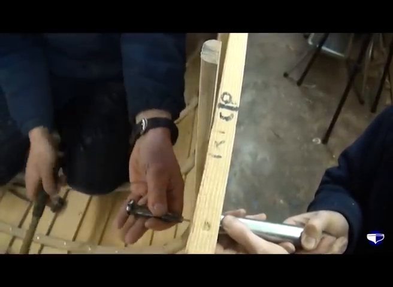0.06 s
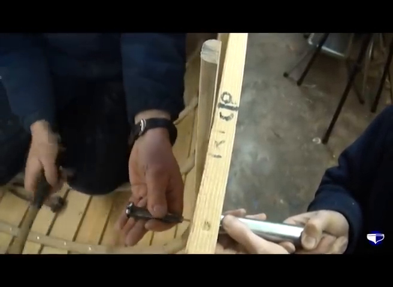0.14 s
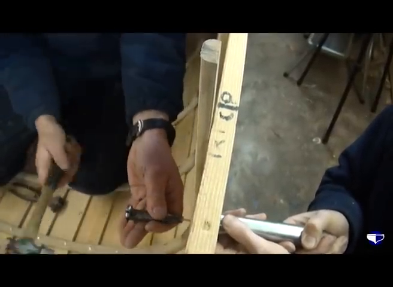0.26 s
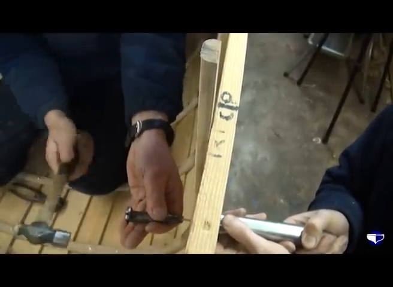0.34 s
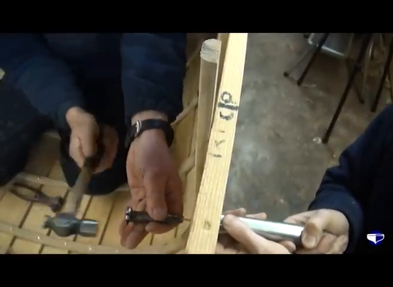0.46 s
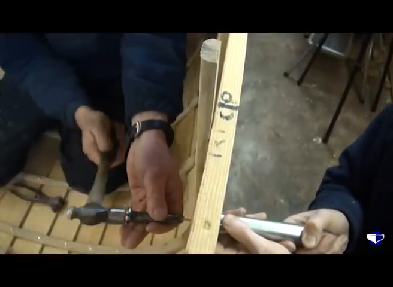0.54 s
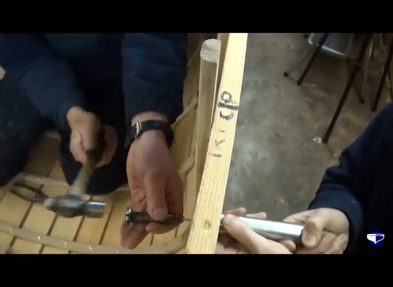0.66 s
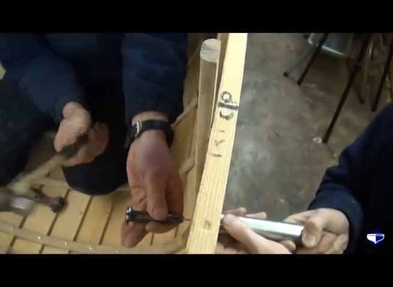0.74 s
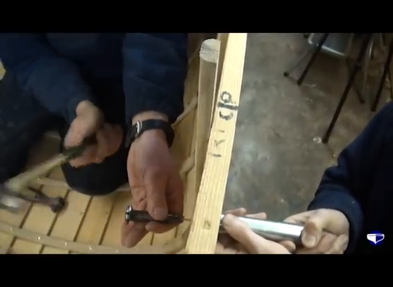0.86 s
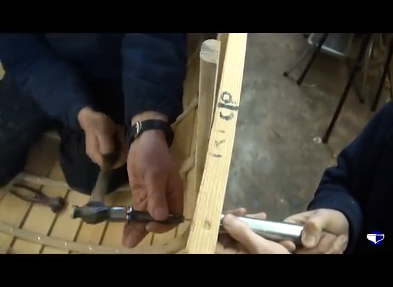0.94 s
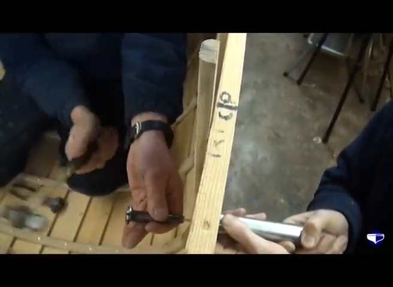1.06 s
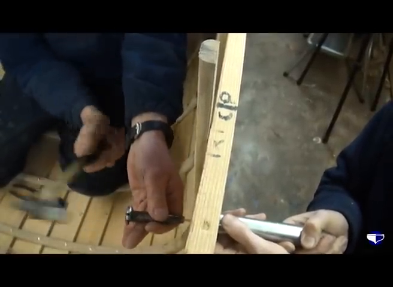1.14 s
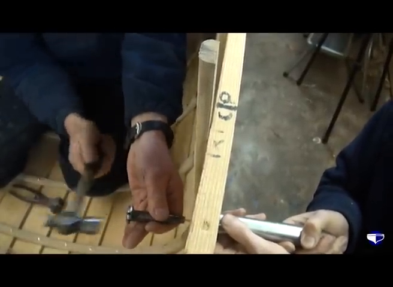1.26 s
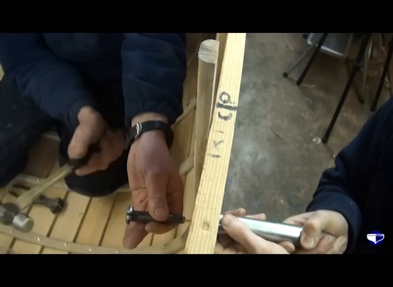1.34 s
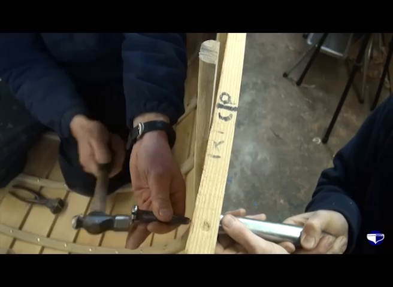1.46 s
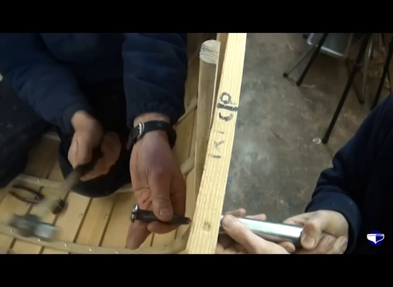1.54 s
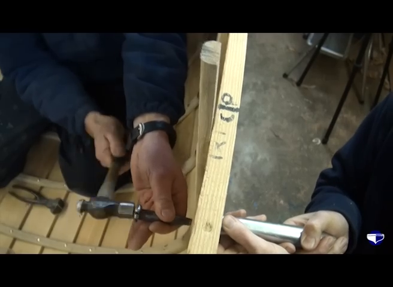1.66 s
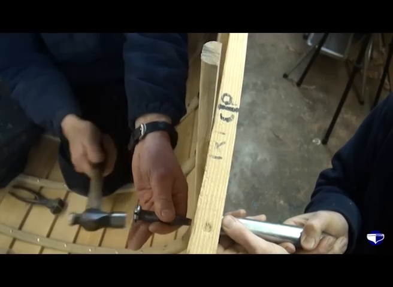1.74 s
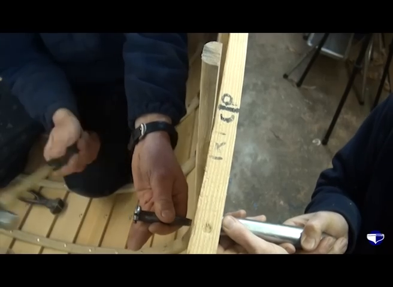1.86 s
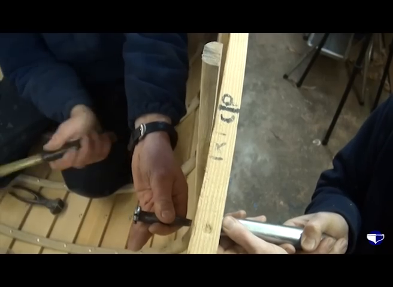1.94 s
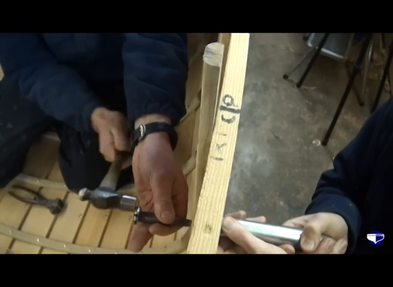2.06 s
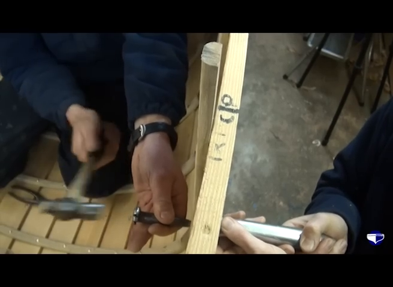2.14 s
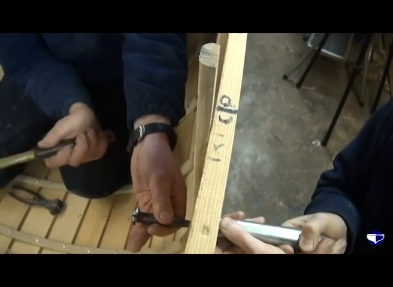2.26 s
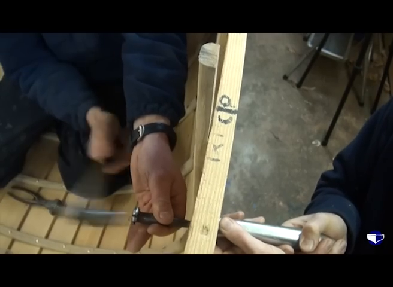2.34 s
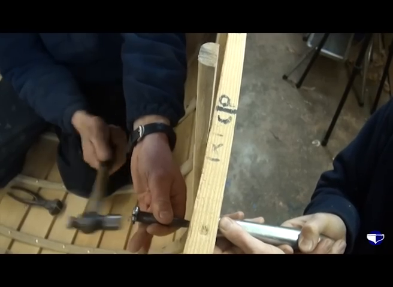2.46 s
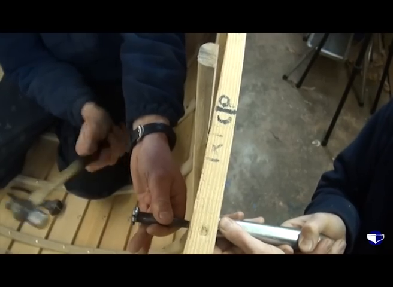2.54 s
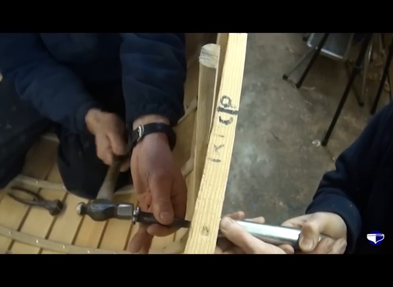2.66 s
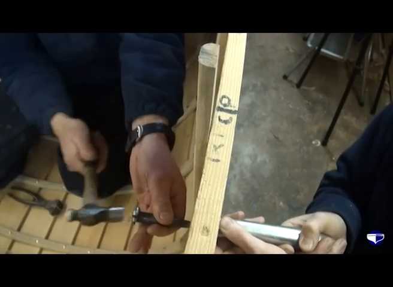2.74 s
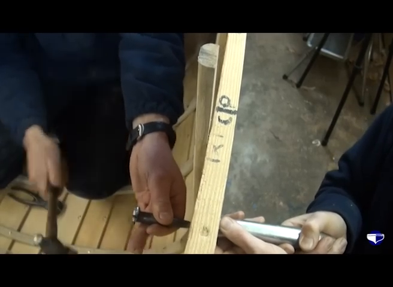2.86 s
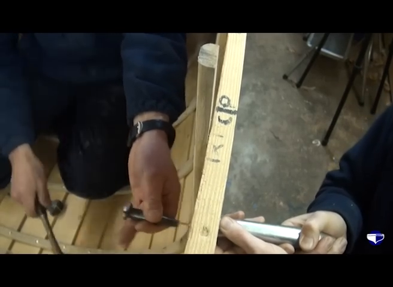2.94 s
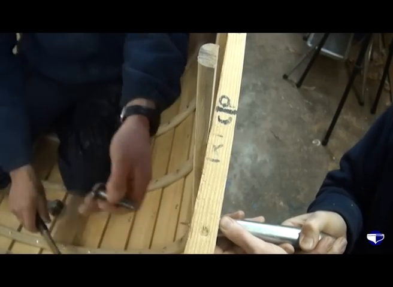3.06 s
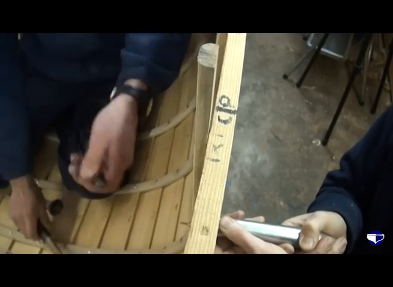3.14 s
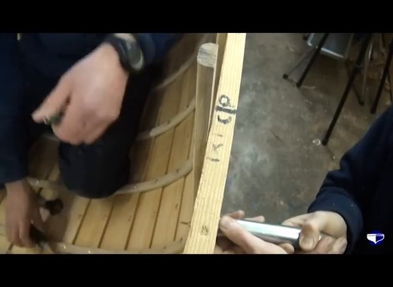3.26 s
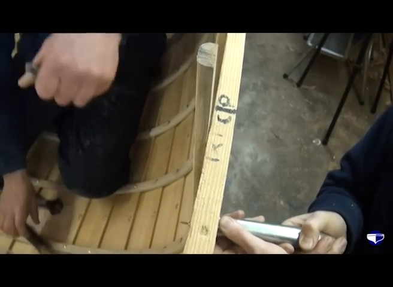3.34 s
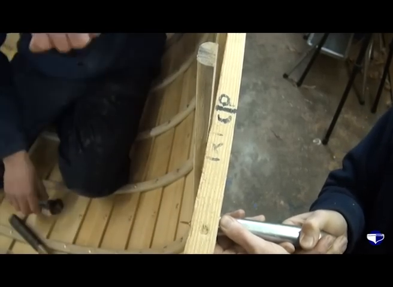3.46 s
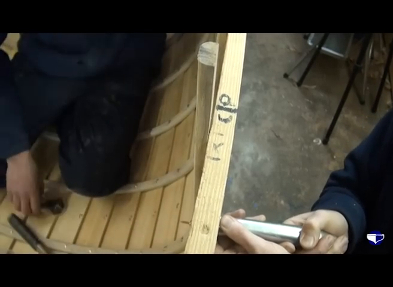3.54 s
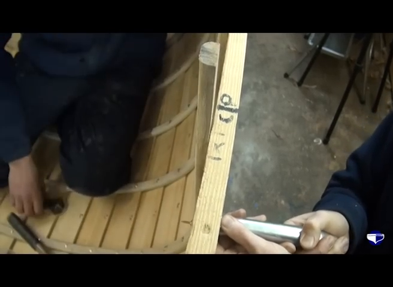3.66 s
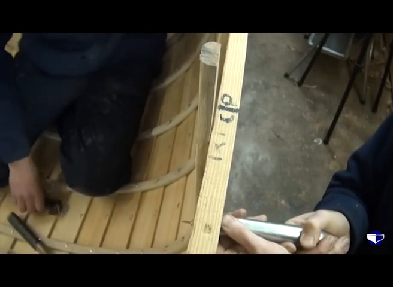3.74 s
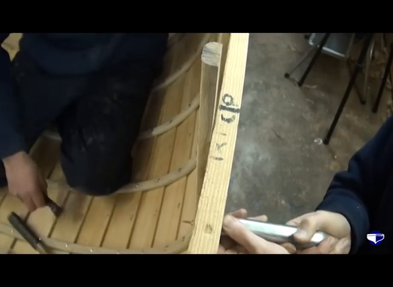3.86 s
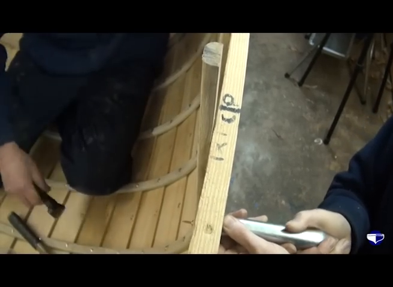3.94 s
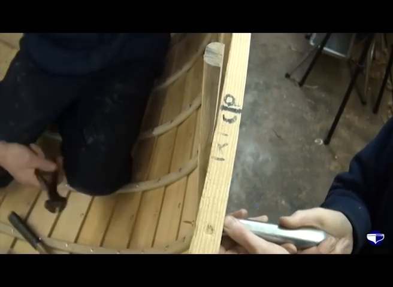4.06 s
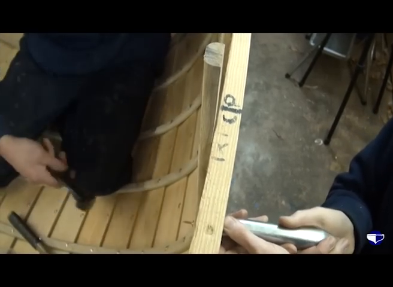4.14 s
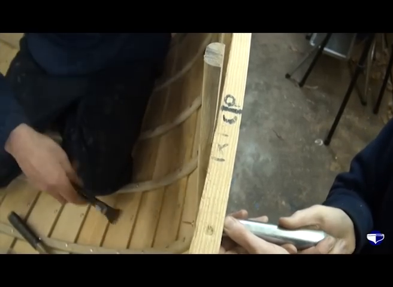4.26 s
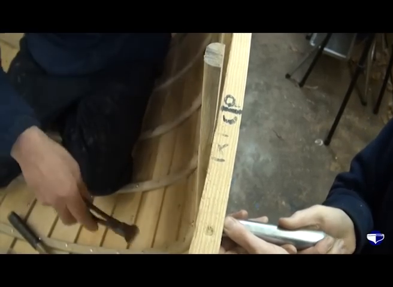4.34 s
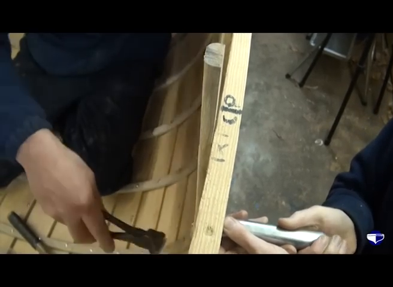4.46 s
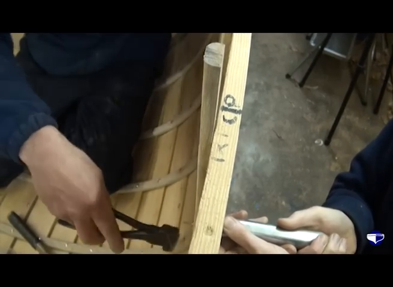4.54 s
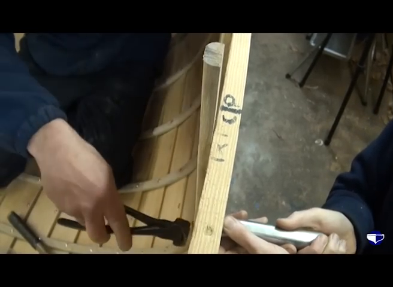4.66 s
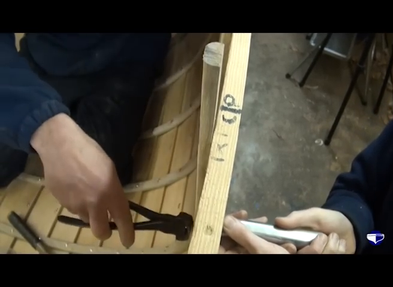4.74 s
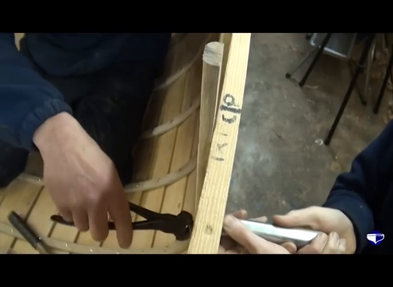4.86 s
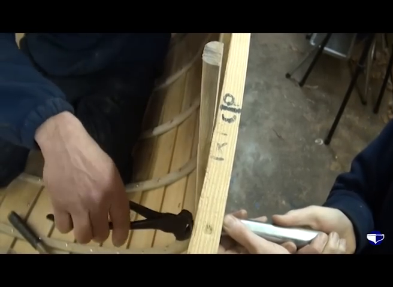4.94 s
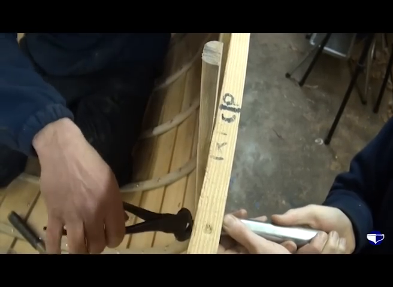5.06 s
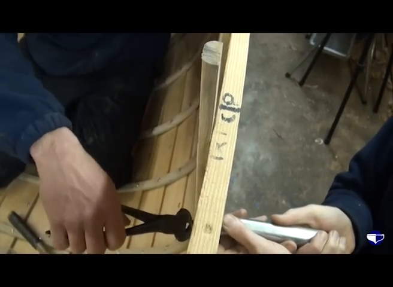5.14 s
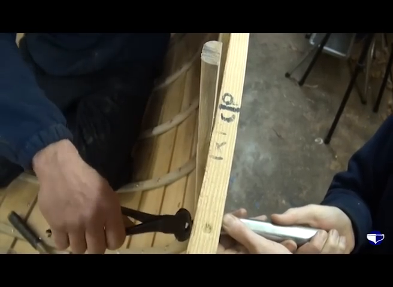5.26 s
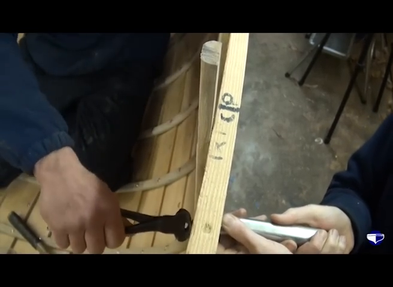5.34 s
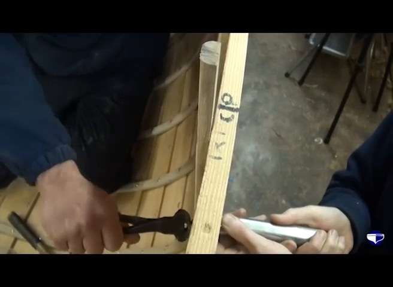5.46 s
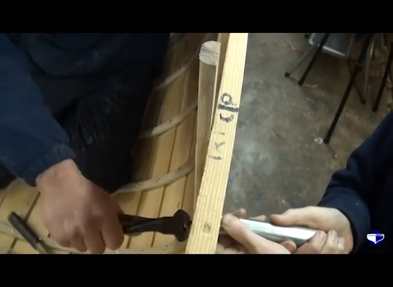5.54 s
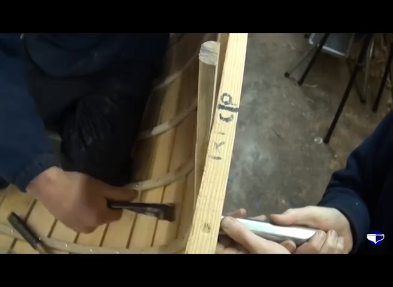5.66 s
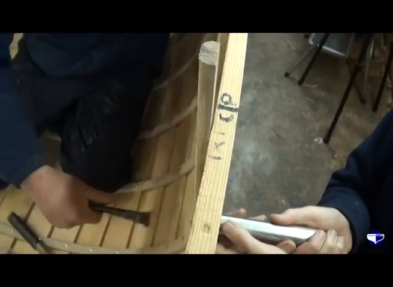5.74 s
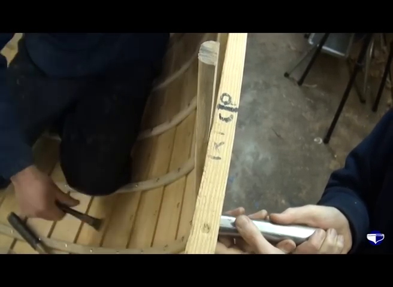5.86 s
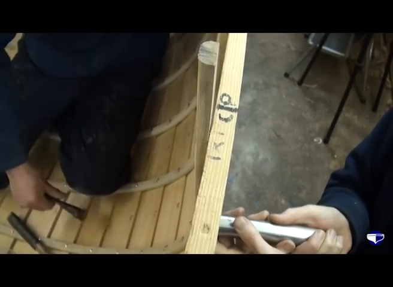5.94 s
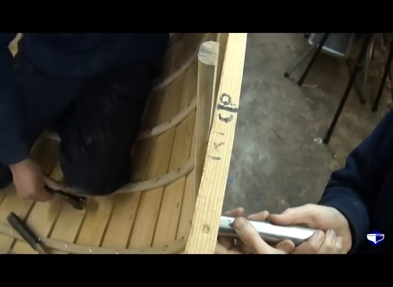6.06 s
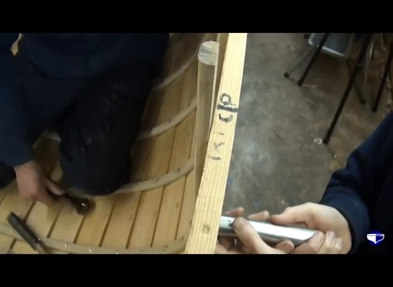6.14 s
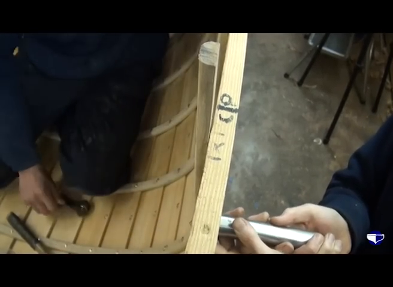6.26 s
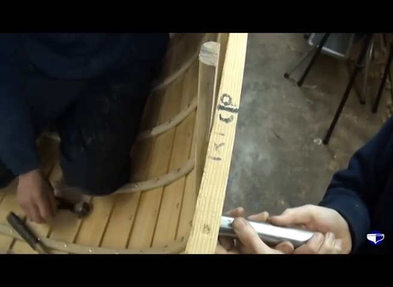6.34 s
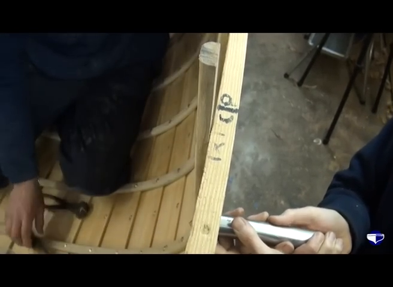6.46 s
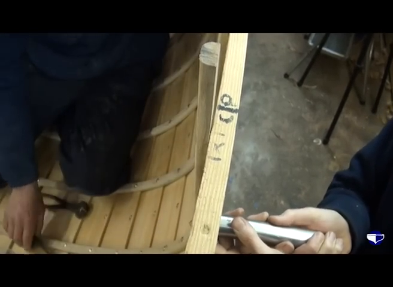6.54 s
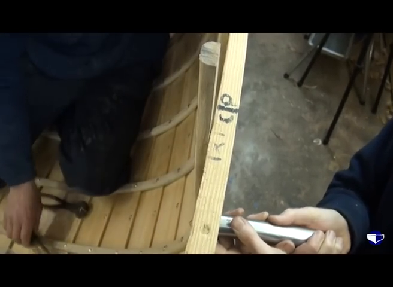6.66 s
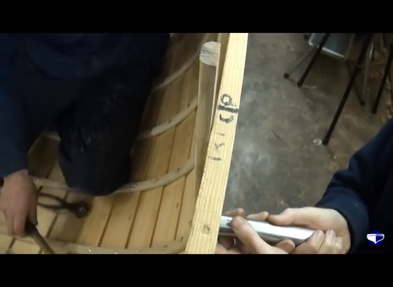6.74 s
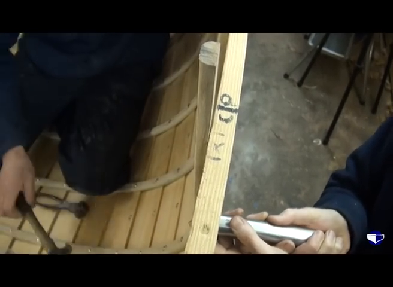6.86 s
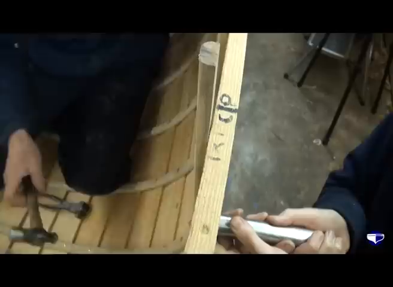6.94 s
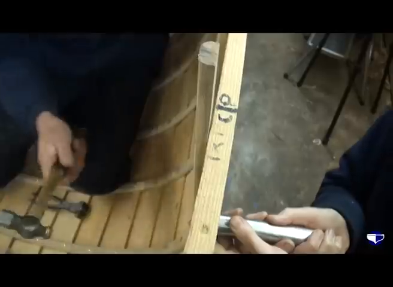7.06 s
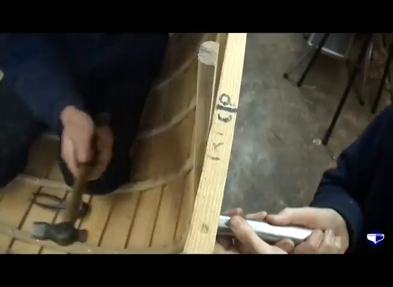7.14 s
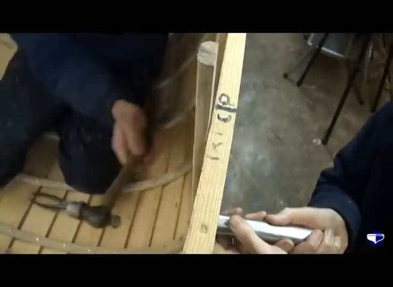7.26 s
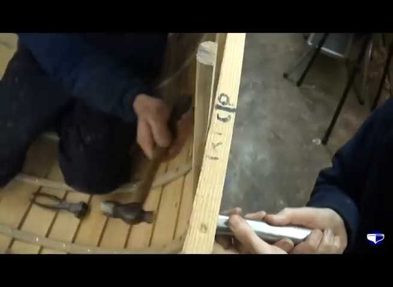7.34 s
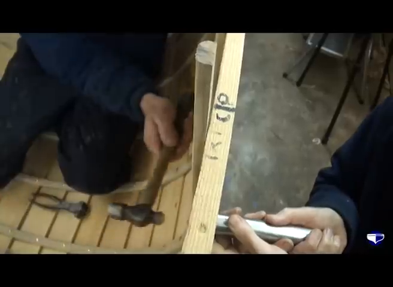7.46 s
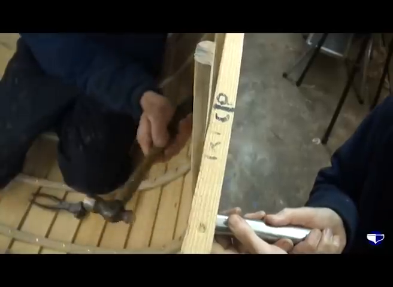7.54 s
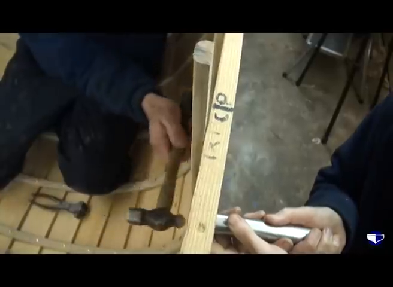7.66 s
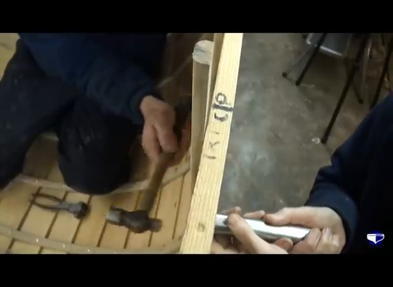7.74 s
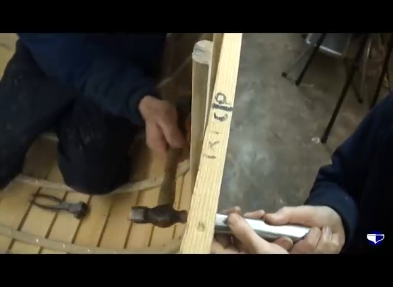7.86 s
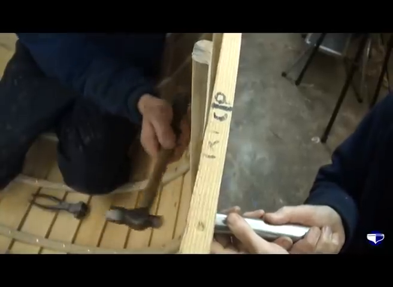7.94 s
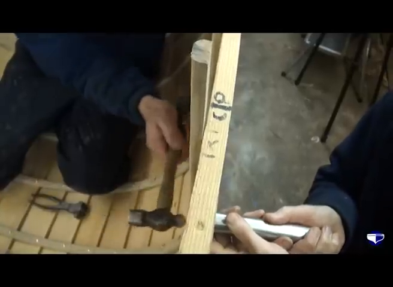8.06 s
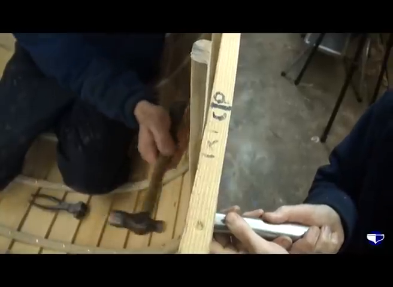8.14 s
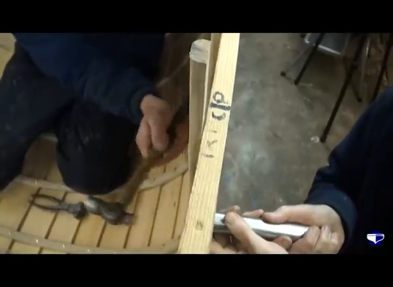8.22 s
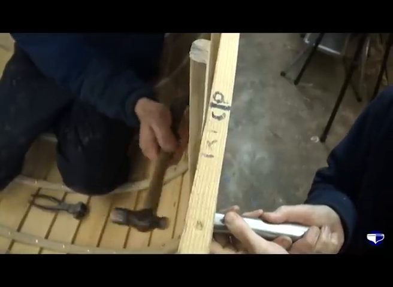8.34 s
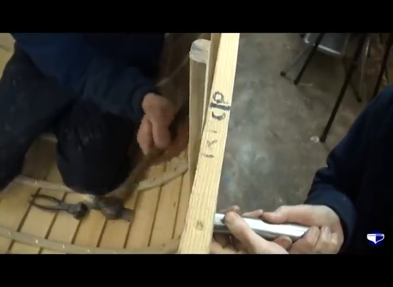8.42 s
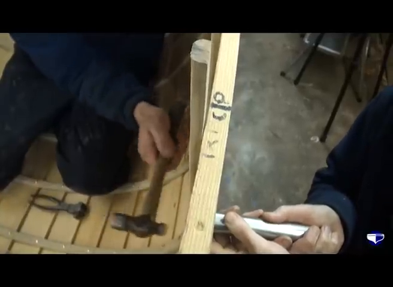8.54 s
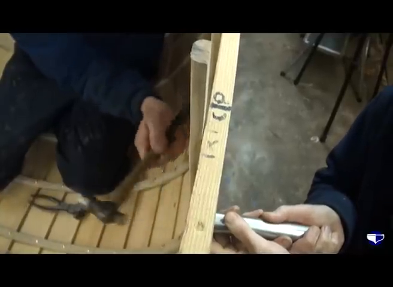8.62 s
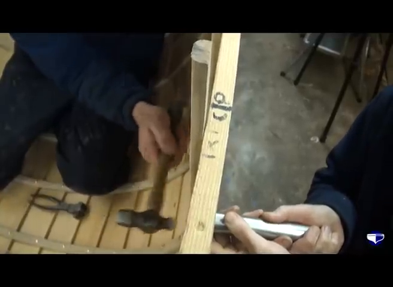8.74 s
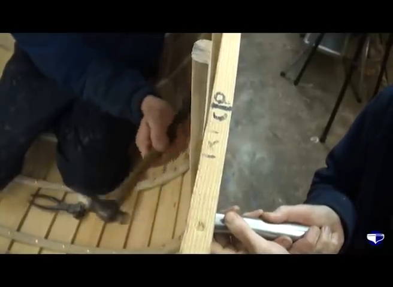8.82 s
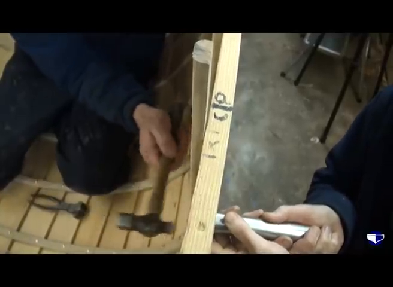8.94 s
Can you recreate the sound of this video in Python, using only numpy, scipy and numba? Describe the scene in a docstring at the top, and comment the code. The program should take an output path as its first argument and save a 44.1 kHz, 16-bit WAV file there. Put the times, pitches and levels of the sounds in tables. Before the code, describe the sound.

Sharp metallic hammer blows, thuds of tools on wood, one bright snip, then another fast run of hammering in a quiet workshop.

```python
"""Inside a wooden boat hull in a workshop, a rib is being riveted. A hammer drives a copper rove down its
nail with a hollow punch, nippers cut the nail short, and lighter blows peen its end over. In between,
tools thud and clack on the planks, the nippers clink and clothes rustle over a faint room tone.
The hull throws each blow back within milliseconds, the workshop rings on, and a fast gain control
flattens the loudest hits."""
import sys
import numpy as np
from scipy import signal
from scipy.fft import rfft, irfft, next_fast_len
from scipy.io import wavfile
from scipy.ndimage import map_coordinates
from numba import njit

SR = 44100
rng = np.random.default_rng(int(sys.argv[2]) if len(sys.argv) > 2 else 0)


def generate_wav(signal):
    """Clip the signal to [-1, 1] and save it as 16-bit WAV at the path in sys.argv[1]."""
    frames = np.transpose(np.atleast_2d(signal))
    scaled = np.clip(frames, -1, 1) * 32767
    pcm = np.round(scaled).astype(np.int16)
    wavfile.write(sys.argv[1], SR, pcm)


N = 396459
HIT_SAMPLES = 32768  # one impact with its tail
T, HZ = np.arange(HIT_SAMPLES) / SR, np.fft.rfftfreq(HIT_SAMPLES, 1 / SR)


def amp(db):
    """Decibels to gain."""
    return 10 ** (np.asarray(db) / 20)


def unit(x):
    """Scale to rms 1."""
    return x / np.sqrt(np.mean(x ** 2) + 1e-20)


def curve(points, hz=HZ):
    """Read (frequency, value) breakpoints along a log frequency axis."""
    freqs, values = np.transpose(points)
    return np.interp(np.log(hz + 1), np.log(freqs + 1), values)


def decay(t, t60):
    """Exponential decay from t = 0, down 60 dB at t60."""
    return (t >= 0) * np.exp(-np.log(1000) * np.abs(t) / t60)


def add(track, at_s, sound):
    """Mix a stereo hit into the track."""
    start = max(round(at_s * SR), 0)
    track[:, start:start + HIT_SAMPLES] += sound[:, :N - start]


def resonances(modes):
    """EQ in dB from resonant peaks, each (frequency [Hz], width [Hz], gain [dB])."""
    return sum(db / (1 + (2 * (HZ - hz) / width) ** 2) for hz, width, db in modes)


def weak_modes():
    """The many weak resonances of planks and steel: a random ripple in dB, closer spaced in the bass."""
    position = 1.4 * np.sqrt(HZ)
    ripple = unit(map_coordinates(rng.standard_normal(int(position[-1]) + 4), [position]))
    return ripple * curve([(200, .4), (600, 1.7), (4500, 1.8), (8000, 2.4), (12000, 3)])


def treble_tilt(db_per_octave, corner_hz=1200):
    """EQ in dB for hardness: a hard, square contact is brighter than a glancing one."""
    return db_per_octave * np.log2(1 + (HZ / corner_hz) ** 2) / 2


def coloured(x, colour_db):
    """Minimum-phase EQ, so peaks ring after the hit; it has unit power, so only the shape counts."""
    cepstrum = irfft(np.log(np.maximum(unit(amp(colour_db)), 1e-6)))
    cepstrum[1:HIT_SAMPLES // 2] *= 2
    cepstrum[HIT_SAMPLES // 2 + 1:] = 0
    return irfft(rfft(x) * np.exp(rfft(cepstrum)))


# Stereo width of diffuse sound: (frequency [Hz], side gain [dB])
SIDE_EQ = [(30, -6), (65, -11), (140, -13), (280, -6), (600, -3), (1100, 1), (2200, -5), (4500, -6.5),
           (8000, -4), (13000, -12.5)]

def diffuse(pair, size):
    """Two unrelated signals, as mid and side, become left and right of a diffuse field."""
    mid = pair[0]
    side_gain = amp(curve(SIDE_EQ, np.fft.rfftfreq(size, 1 / SR)))
    side = irfft(rfft(pair[1], size) * side_gain, size)[:len(mid)]
    return np.array([mid + side, mid - side])


# Workshop reverb: (frequency [Hz], 60 dB decay time [s])
WORKSHOP_DECAY = [(100, 0.88), (260, 0.5), (700, 0.44), (1840, 0.4), (4850, 0.32), (12000, 0.26)]

def acoustics(hull_s=0.006, hull_t60=0.18, hull_db=2, direct_t60=0.019, direct_db=0):
    """A random impulse response in two parts: (direct sound plus hull reflections, workshop tail)."""
    noise = rng.standard_normal((5, HIT_SAMPLES))
    direct = amp(direct_db) * decay(T, direct_t60) * noise[0]
    since_echo = np.maximum(T - hull_s, 0)
    hull_envelope = amp(hull_db) * decay(since_echo, hull_t60) * (1 - np.exp(-since_echo / 0.00048))
    hull = hull_envelope * diffuse(noise[1:3] * [[1], [.5]], HIT_SAMPLES)
    hz, t, bands = signal.stft(noise[3:], SR, nperseg=256)
    bands = bands * decay(t, curve(WORKSHOP_DECAY, hz)[:, None])
    tail = signal.istft(bands, SR, nperseg=256)[1][:, :HIT_SAMPLES]
    build_up = 1 - np.exp(-since_echo / 0.0091)
    return np.array([direct + hull, diffuse(tail * build_up, HIT_SAMPLES)])


def impact(colour_db, room_db, hull_s=0.00037):
    """A single hit of the given colour; on the planks themselves the hull answers at once."""
    near, tail = acoustics(hull_s=hull_s, hull_t60=0.11)
    return coloured(near + amp(room_db) * tail, colour_db + weak_modes())


def noise_bed(spectrum):
    """Steady diffuse noise of the given spectrum, at rms 1."""
    size = next_fast_len(N + HIT_SAMPLES)
    gain = amp(curve(spectrum, np.fft.rfftfreq(size, 1 / SR)))
    pair = irfft(rfft(rng.standard_normal((2, size))) * gain, size)
    return unit(diffuse(pair, size)[:, :N])


# Low room tone with hiss on top: (frequency [Hz], relative level [dB])
ROOM_TONE_EQ = [(15, -11), (25, -8.5), (114, 6.5), (190, 1.5), (217, 3), (405, -9.5), (503, -5.5),
                (560, -15.5), (1190, -8), (4610, -13), (11600, -13.5), (14800, -9.5), (16000, -15.5)]

def room_tone(level_db=-67):
    """The still workshop and a faint, even hiss."""
    return amp(level_db) * noise_bed(ROOM_TONE_EQ)


# Sleeves and knees shifting: (peak time [s], length at half height [s], level [dB])
BODY_MOVES = [(0.116, .16, -53), (0.417, 0.74, -57), (3.681, 0.13, -63.5), (6.726, 0.19, -58),
              (7.375, 0.41, -59.5), (7.653, .11, -57.5)]
# Soft rub of cloth: (frequency [Hz], relative level [dB])
RUB_EQ = [(47, -41), (80, -13), (140, 0.5), (207, -1.5), (413, -7.5), (757, -7), (1510, -17.5),
          (2830, -13.5), (10800, -30), (14000, -25.5)]
# Grit and seams catching: (frequency [Hz], relative level [dB])
SCRAPE_EQ = [(200, -22.5), (800, -3), (1500, -5), (3200, -1.5), (6000, -15.5), (15000, -22)]

def clothes(fidget_db=-72, flutter_db=1.6, catches_per_s=45, scrapes_per_s=22, scrape_db=-11.5):
    """Cloth rubs in uneven catches and short scrapes; never quite still, it swells with each move."""
    t = np.arange(N) / SR
    swells = sum(amp(db) * .5 ** ((2 * (t - peak_s) / length) ** 2) for peak_s, length, db in BODY_MOVES)
    catches = map_coordinates(rng.standard_normal(N // 100), [t * catches_per_s])
    snags = (rng.random(N) < scrapes_per_s / SR) * rng.random(N)
    scrape_envelope = signal.fftconvolve(snags, decay(T, t60=.04))[:N]
    scrapes = unit(scrape_envelope * noise_bed(SCRAPE_EQ))
    rub = amp(flutter_db * catches) * noise_bed(RUB_EQ)
    return (amp(fidget_db) + swells) * (rub + amp(scrape_db) * scrapes)


# Tick of the tools being set in place: (frequency [Hz], relative level [dB])
SET_TICK_EQ = [(80, -19), (400, 7.5), (1200, -2), (2500, 7.5), (3500, -12), (5000, -37), (15000, -16)]

def punch_handling():
    """One tick as hammer and punch are set on the nail, a thinner one as the punch slides off."""
    track = np.zeros((2, N))
    near, _ = acoustics(hull_db=-14, hull_t60=.04, direct_t60=.035)
    add(track, 0.402, amp(-39) * coloured(near, curve(SET_TICK_EQ)))
    slide_off_eq = curve([(1500, -21.5), (4500, 6), (14000, -21.5)])
    add(track, 3.01, amp(-54.5) * impact(slide_off_eq, room_db=-6.5, hull_s=.0055))
    return track


# Light touches of steel, and at 5.667 s the last bounce of the cut-off nail end: (time [s], level [dB])
TAP_CUES = [(4.767, -39.5), (4.796, -36.5), (4.812, -33.5), (4.835, -46), (5.406, -64), (5.667, -47.5)]
# Woody body of a tap: (frequency [Hz], relative level [dB])
TAP_EQ = [(29, -43.5), (50, -19), (362, 0), (759, -12), (919, -21), (1010, -16), (1410, -21), (2070, -19),
          (2500, -24), (4340, -20.5), (7160, -38), (15000, -37.5)]

def nail_taps():
    """Steel taps lightly against the nail and the rib, and the cut-off end of the nail bounces once more on the
    planks."""
    track = np.zeros((2, N))
    for at_s, level_db in TAP_CUES:
        add(track, at_s, amp(level_db) * impact(curve(TAP_EQ), room_db=-4))
    return track


# Nipper clinks: (time [s], relative level [dB], hardness [dB/octave])
CLINK_CUES = [(4.074, -51.5, -1.5), (4.101, -44, 2.5), (4.160, -43.5, -5), (6.25, -47.5, 3),
              (6.275, -43, -5), (6.404, -28.5, 4.5), (6.467, -41.5, -1), (6.563, -49.5, -2)]
# Ringing partials of the nippers: (frequency [Hz], relative level [dB], 60 dB decay time [s])
CLINK_PARTIALS = [(2528, -6, 0.12), (2820, 5, 0.04), (4520, -1.5, 0.062), (5510, -2, 0.044),
                  (5830, -9.5, .14), (8270, -15.5, 0.19), (9100, -19, .16)]

def nipper_clinks():
    """Loose jaws and handles touch: a sharp tick, and the steel rings in a new balance each time."""
    track = np.zeros((2, N))
    for at_s, level_db, hardness in CLINK_CUES:
        partials = [(hz, db + hardness * np.log2(hz / 4000), t60) for hz, db, t60 in CLINK_PARTIALS]
        ring = np.zeros((2, HIT_SAMPLES))
        for hz, db, t60 in partials:
            gain = amp(db + rng.normal(0, 1.2, (2, 1)))
            phase = rng.uniform(0, 6, (2, 1))
            ring += gain * decay(T, t60) * np.sin(2 * np.pi * hz * T + phase)
        tick = impact(resonances([(hz, 220, 27.5 + db) for hz, db, _ in partials]), room_db=-17.5)
        add(track, at_s, amp(level_db) * (amp(-9) * ring + amp(-8.5) * tick))
    return track


# Tools put down or picked up:
# (first touch [s], rocking time [s], thud level [dB], clack level [dB], hardness [dB/octave])
KNOCK_CUES = [(0.003, .040, -41, -54.5, 2.5), (3.235, .019, -21.5, -19.5, 1.5),
              (3.322, .018, -30, -28.5, -4), (3.366, .030, -23, -29.5, -2), (3.703, .008, -67, -55, 2.5),
              (3.80, 0.017, -52.5, -64, 5), (4.05, 0.023, -62, -79, 0), (6.2, .008, -22.5, -36, 1),
              (6.238, .010, -19.5, -36, -3), (6.39, .012, -16, -30, 1.5), (6.455, .010, -29, -37, -0.5),
              (6.745, .016, -53, -55.5, -1), (7.255, .008, -50, -53.5, 3)]
# Low thud of the planks: (frequency [Hz], relative level [dB])
PLANK_EQ = [(24, -71.5), (40, -34), (80, -12.5), (234, -1), (324, 2), (526, -11.5), (750, -22), (916, -26),
            (1030, -21), (1200, -42), (1560, -55), (2640, -120)]
# Clack of steel on wood: (frequency [Hz], relative level [dB])
CLACK_EQ = [(260, -34.5), (450, -1.5), (679, -2), (897, -5), (1170, -8.5), (1870, -12.5), (4570, -21),
            (9520, -43.5), (13900, -42), (15000, -61.5)]

def tools_on_planks(first_thud_db=-5, first_clack_db=-14.5):
    """A tool touches lightly with one end, then rocks onto the other: planks thud, steel clacks."""
    track = np.zeros((2, N))
    thud_eq = curve(PLANK_EQ) + resonances([(225, 42, 2.7)])
    for at_s, rock_s, thud_db, clack_db, hardness in KNOCK_CUES:
        clack_eq = curve(CLACK_EQ) + treble_tilt(hardness)
        first_touch = (at_s, thud_db + first_thud_db, clack_db + first_clack_db)
        landing = (at_s + rock_s, thud_db, clack_db)
        for touch_s, wood_db, steel_db in (first_touch, landing):
            add(track, touch_s, amp(wood_db) * impact(thud_eq, room_db=-5.5))
            add(track, touch_s, amp(steel_db) * impact(clack_eq, room_db=-6.5))
    return track


# Body of the bite as the nail parts: (frequency [Hz], relative level [dB])
BITE_EQ = [(60, -21), (170, -10.5), (310, -8.5), (500, -10.5), (1000, -12), (1400, -17), (1900, -21),
           (3000, -17.5), (4400, -19.5), (6500, -40), (12000, -34.5), (16000, -39.5)]
# Two peaks and a notch in the bite: (frequency [Hz], width [Hz], gain [dB])
BITE_MODES = [(309, 88, 13.5), (1213, 190, 11.5), (3470, 350, -17)]

def nail_cut():
    """The jaws bite through the nail with a bright snap, and the cut-off end drops, striking the planks twice."""
    track = np.zeros((2, N))
    bite = impact(curve(BITE_EQ) + resonances(BITE_MODES), room_db=-7, hull_s=0.004)
    near, _ = acoustics(hull_s=0.0028, hull_t60=.025, direct_db=-12)
    snap = coloured(near, curve([(500, -27.5), (3000, 2), (16000, -3)]))
    add(track, 5.4995, amp(-20.5) * bite + amp(-30) * snap)
    offcut_eq = curve(PLANK_EQ) + resonances([(314, 210, 20)])
    for at_s, level_db in [(5.542, -24), (5.585, -33)]:
        add(track, at_s, amp(level_db) * impact(offcut_eq, room_db=-21))
    return track


def bell(hz, octaves):
    """An EQ bell of height 1 around hz, octaves wide at half height."""
    return .5 ** ((2 * np.log2((HZ + 1) / hz) / octaves) ** 2)


def seating(hardness, thump_db, lower_hz, upper_hz, ring_db, peak_q=17, peak_db=4.5):
    """One blow's EQ: a square hit is bright, a backed rib thumps, clamped metal rings at two pitches."""
    thump = thump_db * bell(235, octaves=1.6)  # the rib against the planking
    humps = ring_db * (bell(lower_hz, octaves=0.81) + bell(upper_hz, octaves=0.81))
    peaks = resonances([(hz, hz / peak_q, peak_db) for hz in (lower_hz, upper_hz)])
    return treble_tilt(hardness) + thump + humps + peaks


def hammering(blows, body_eq, room_db, drift, direct_db, crack_db):
    """Blows on one spot share an echo pattern, which drifts as the tool and the hands shift."""
    track = np.zeros((2, N))
    echoes = acoustics(direct_db=direct_db)
    crack_eq = curve([(3000, 0), (8000, crack_db / 2), (15000, crack_db)])
    for at_s, force_db, *seat in blows:
        echoes = np.sqrt(1 - drift) * echoes + np.sqrt(drift) * acoustics(direct_db=direct_db)
        near, tail = echoes
        blow_eq = body_eq + weak_modes() + seating(*seat)
        attack = coloured(near, blow_eq + crack_eq)  # the first arrivals keep their treble
        reverb = amp(room_db) * coloured(tail, blow_eq)
        add(track, at_s, amp(force_db) * (attack + reverb))
    return track


# Hammer on the cut nail: (time [s], force [dB], hardness [dB/octave], thump [dB],
# lower ring [Hz], upper ring [Hz], ring boost [dB])
PEEN_CUES = [(7.74, -14.5, -2.5, 5, 1840, 2940, 1), (7.947, -12, -5.5, -2, 606, 1365, -1),
             (8.1455, -13, -0.3, 6, 2060, 5300, 3.5), (8.347, -12, 1.3, 2, 2660, 4600, 2),
             (8.5475, -13, 1.7, 1, 2700, 6300, -0.5), (8.7515, -14, 1.95, 1, 2640, 3760, 0.5),
             (8.9525, -14, 2.1, -2.5, 2606, 3585, 0.5)]
# Body of a peening blow: (frequency [Hz], relative level [dB])
PEEN_EQ = [(21, -50), (35, -26.5), (103, -16), (151, -15.5), (325, -2.5), (431, -8), (667, -5), (979, -8.5),
           (1330, -6), (1770, -9.5), (2530, -7.5), (4800, -15.5), (9340, -30.5), (12400, -37),
           (16000, -53.5)]
# Peaks and notches of a peening blow: (frequency [Hz], width [Hz], gain [dB])
PEEN_RESONANCES = [(104, 14, 9.5), (212, 10, 8.5), (307, 143, 2), (707, 460, 6), (1090, 37, 5),
                   (1370, 44, 5), (1904, 151, 2), (2520, 64, 2.5), (2584, 99, -2), (2810, 150, 3.5),
                   (3340, 42, 5.5), (3430, 53, 6), (3746, 38, 4.5), (3600, 70, -0.5), (3670, 40, 3),
                   (3990, 100, 2.5), (4100, 61, 2.5), (4100, 31, -3.5), (4580, 96, 6.5), (4930, 39, 4.5),
                   (6080, 28, -6), (6480, 30, -9), (8300, 700, 3.2), (13700, 900, 5.5)]

def peening():
    """Quick, lighter hammer blows spread the cut end of the nail over the rove."""
    body_eq = curve(PEEN_EQ) + resonances(PEEN_RESONANCES)
    return hammering(PEEN_CUES, body_eq, room_db=4.5, drift=0.5, direct_db=-3, crack_db=3.5)


# Hammer on the rove punch: (time [s], force [dB], hardness [dB/octave], thump [dB],
# lower ring [Hz], upper ring [Hz], ring boost [dB])
PUNCH_CUES = [(0.607, -17, -1.15, 1.5, 770, 1250, 7.5), (1.007, -10, 0.54, 0, 1030, 2380, 6),
              (1.2565, -11, 1.7, 2, 2640, 5300, 4), (1.4895, -13, 2.8, -5.5, 680, 1286, 3.5),
              (1.73, -12.5, -0.9, -3.5, 830, 2840, 3.5), (2.116, -12.5, 2, 4, 1584, 2010, 1.5),
              (2.4345, -13, 2, 5.5, 1570, 2020, 2), (2.72, -15.5, 1.1, 1.5, 1550, 1973, 2)]
# Body of a punch blow: (frequency [Hz], relative level [dB])
PUNCH_EQ = [(21, -57), (35, -25.5), (216, -4), (360, -1.5), (557, -5.5), (758, -4), (1060, -5),
            (1400, -8.5), (2010, -4.5), (3100, -7.5), (4110, -7), (7230, -18), (9580, -20.5),
            (13700, -33.5), (16000, -41.5)]
# Ringing peaks of a punch blow: (frequency [Hz], width [Hz], gain [dB])
PUNCH_RESONANCES = [(103.3, 14, 7.6), (232, 190, 5.2), (743, 100, 1.6667), (1066, 24, 4.6), (1284, 39, 3.6),
                    (2110, 41, 2.8), (2500, 27, 3.4), (2714, 130, 2), (3640, 150, 4.2), (3930, 37, 10),
                    (4200, 140, 5.4), (4500, 43, 1.6667), (4680, 40, 8.1), (5330, 170, 2.04),
                    (5640, 22, 5.5), (5710, 27, 1.3333), (5940, 61, 5.4), (8800, 370, 1.2),
                    (9370, 140, 6.8), (11740, 430, 1.7), (13100, 1000, 7.4)]

def rove_punch():
    """The hammer strikes the hollow punch, driving the copper rove down its nail."""
    body_eq = curve(PUNCH_EQ) + resonances(PUNCH_RESONANCES)
    return hammering(PUNCH_CUES, body_eq, room_db=6, drift=0.48, direct_db=-6, crack_db=7.5)


def scene():
    """All the work, panned a little left, over the room tone."""
    work = rove_punch() + peening()
    work += tools_on_planks() * amp([[.4], [-.4]])  # a touch further left
    work += nipper_clinks() + punch_handling() + nail_taps() + nail_cut() + clothes()
    return work * amp([[.7], [-.7]]) + room_tone()


@njit
def follow(power, attack, release):
    """Envelope follower with attack and release times in samples."""
    envelope, level = np.empty_like(power), 0.
    for i in range(len(power)):
        level += (power[i] - level) / (attack if power[i] > level else release)
        envelope[i] = level
    return envelope


def record(dry, ceiling_db=-17.5, attack_s=0.0018, release_s=.011, ahead_s=0.00086, top_hz=16000):
    """Look-ahead gain control flattens loud blows, a soft clip rounds peaks, and the top is cut off."""
    level = np.sqrt(follow(np.mean(dry ** 2, axis=0), attack_s * SR, release_s * SR))
    level_ahead = np.interp(np.arange(N) + ahead_s * SR, np.arange(N), level)
    held = dry / (1 + (level_ahead / amp(ceiling_db)) ** 6) ** (1 / 6)
    rounded = held / (1 + (held / .52) ** 6) ** (1 / 6)
    size = next_fast_len(N + HIT_SAMPLES)
    passband = np.fft.rfftfreq(size, 1 / SR) < top_hz
    return irfft(rfft(rounded, size) * passband, size)[:, :N]


dry = scene()
out = record(dry)
generate_wav(out)
```